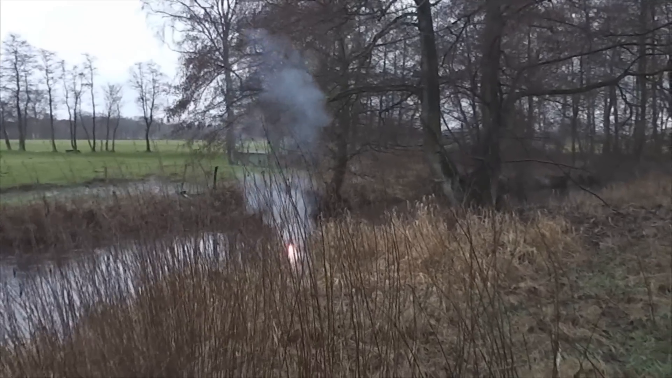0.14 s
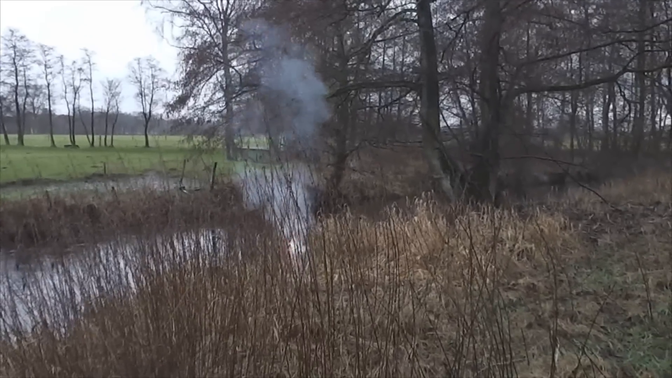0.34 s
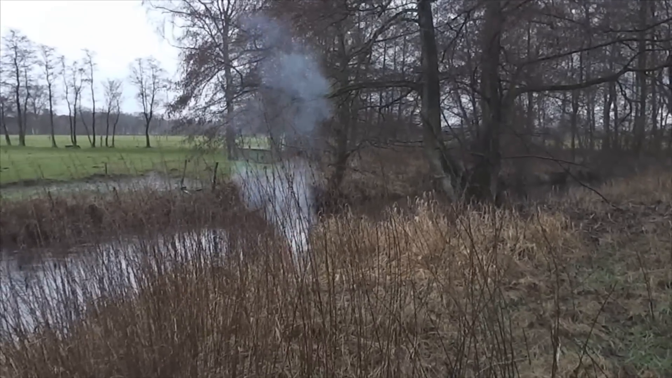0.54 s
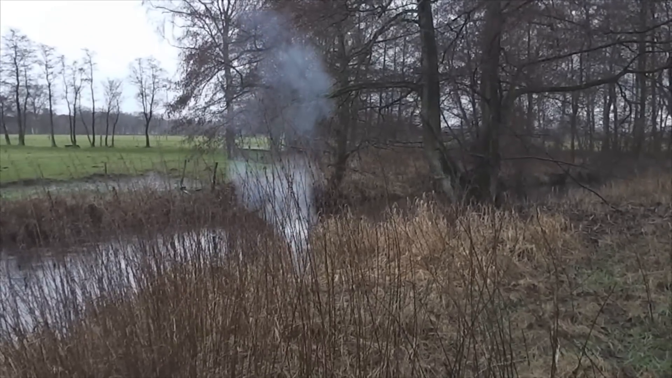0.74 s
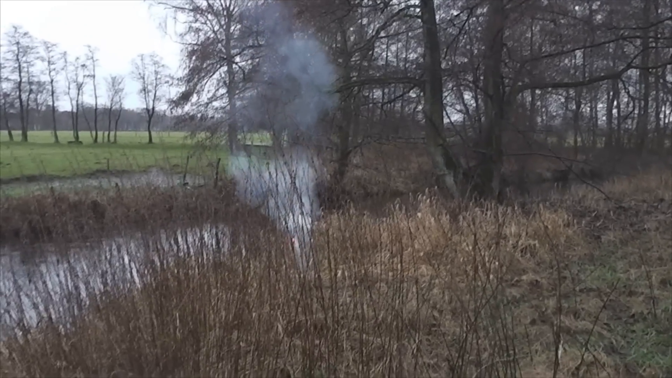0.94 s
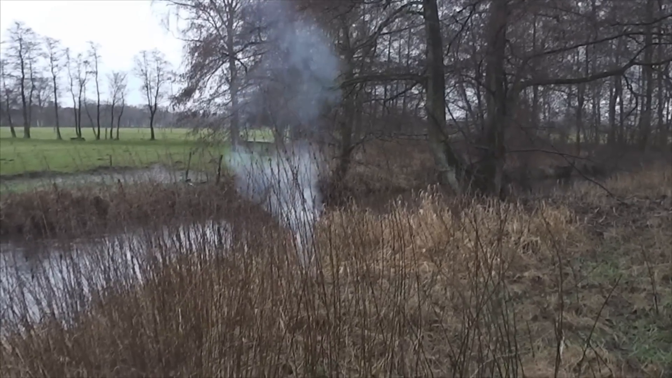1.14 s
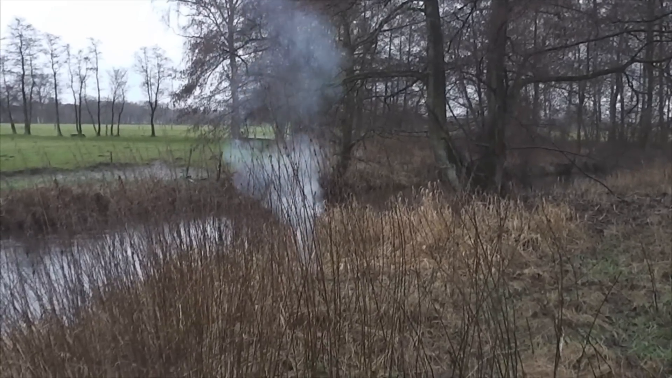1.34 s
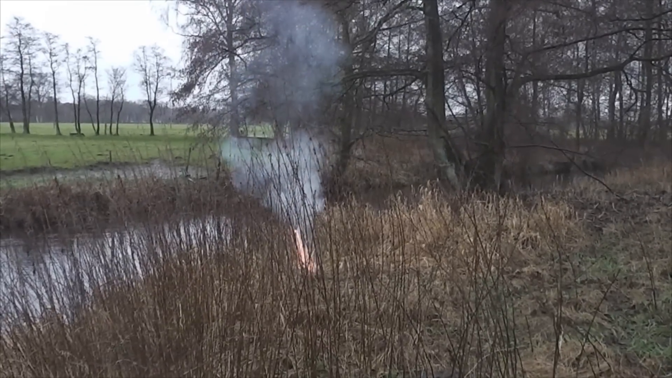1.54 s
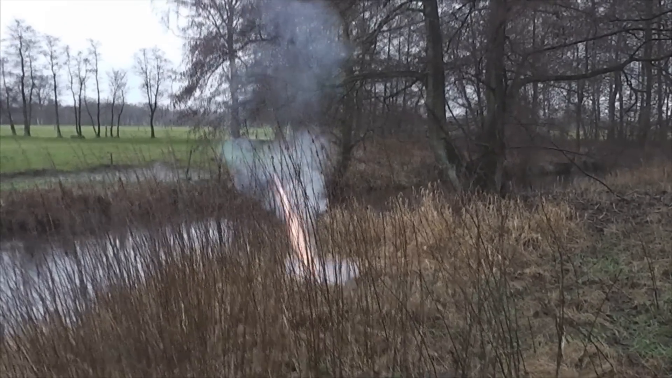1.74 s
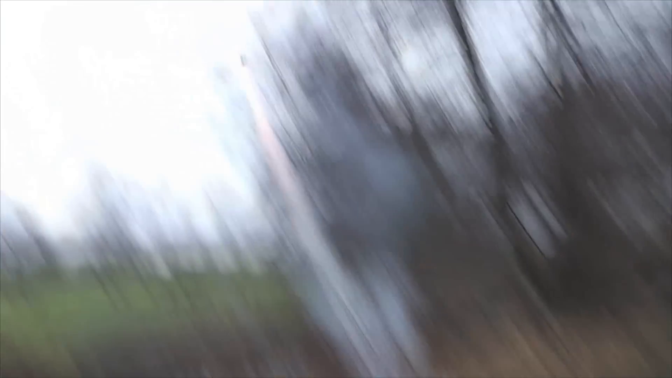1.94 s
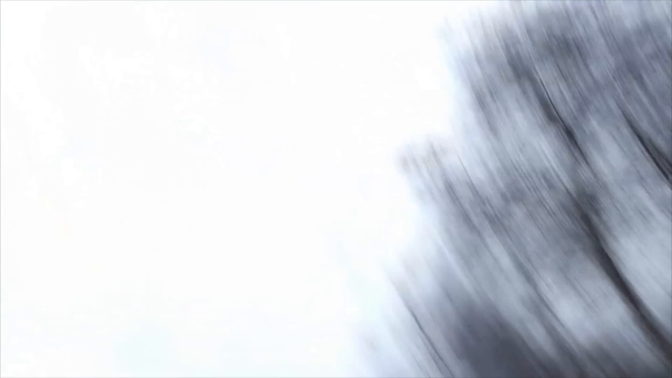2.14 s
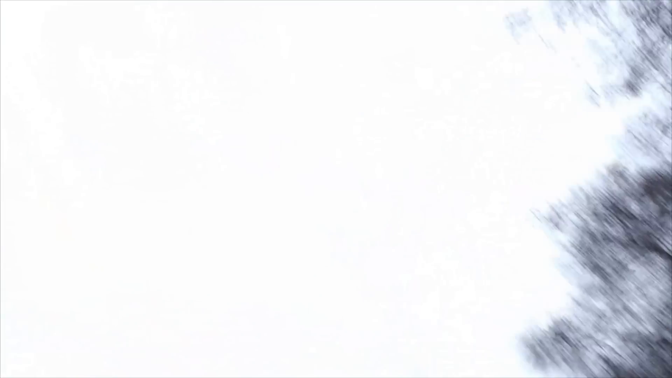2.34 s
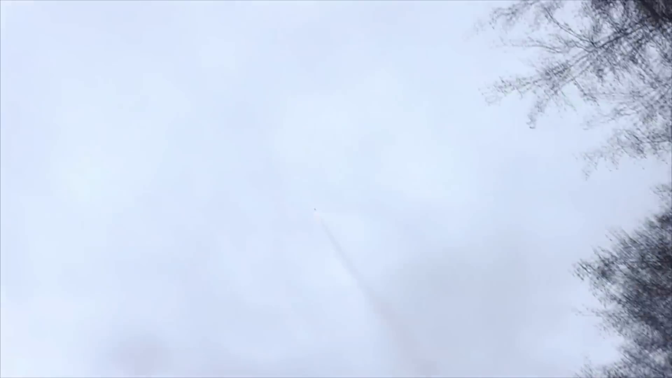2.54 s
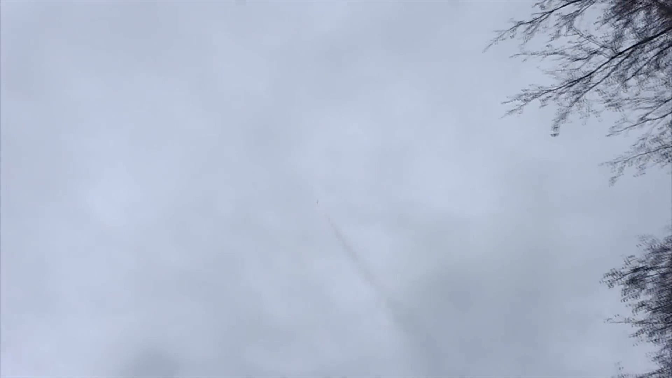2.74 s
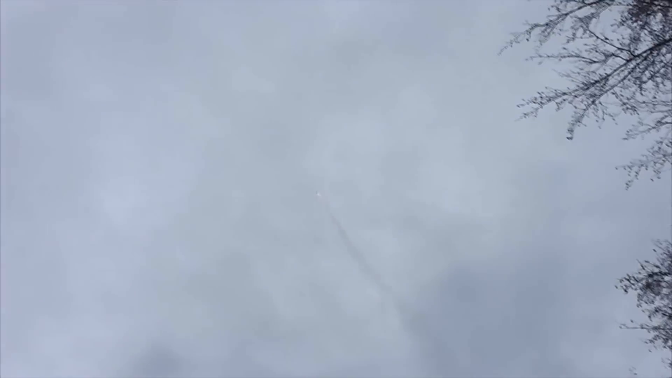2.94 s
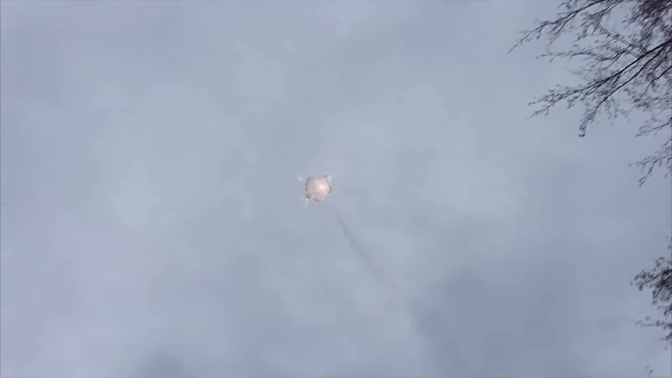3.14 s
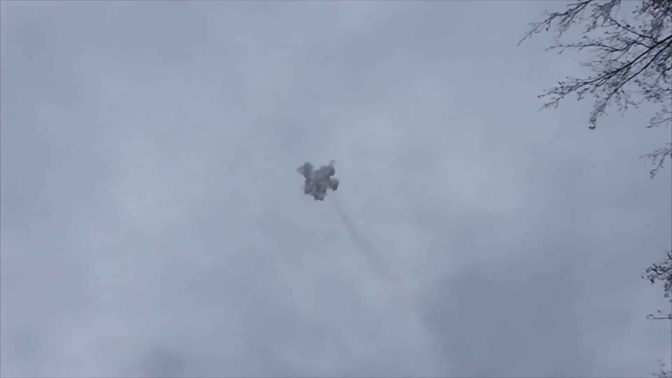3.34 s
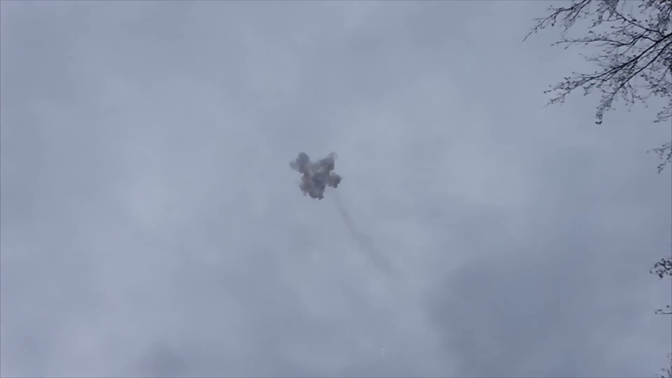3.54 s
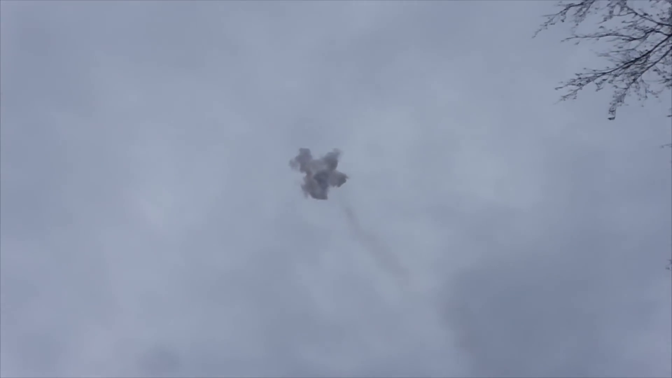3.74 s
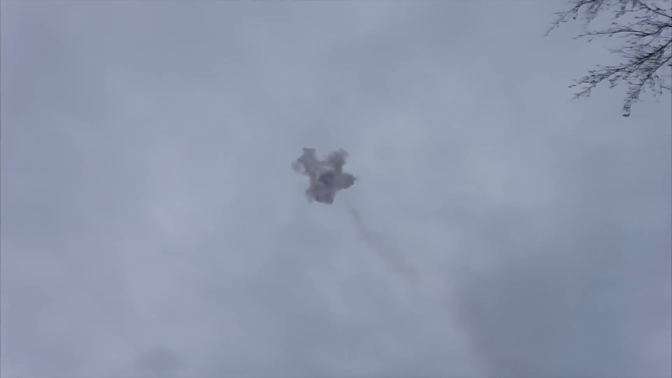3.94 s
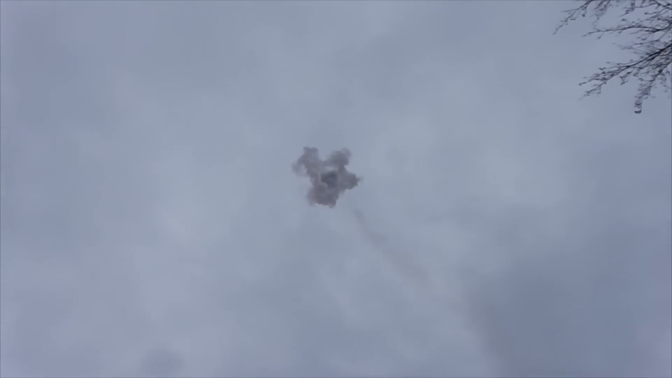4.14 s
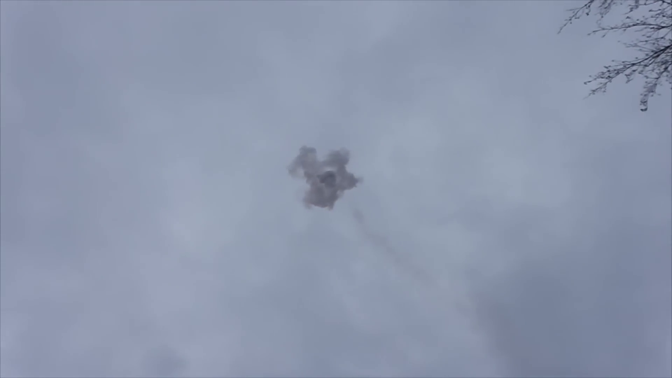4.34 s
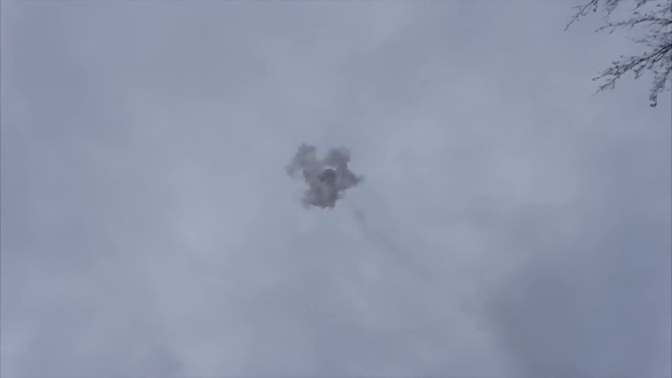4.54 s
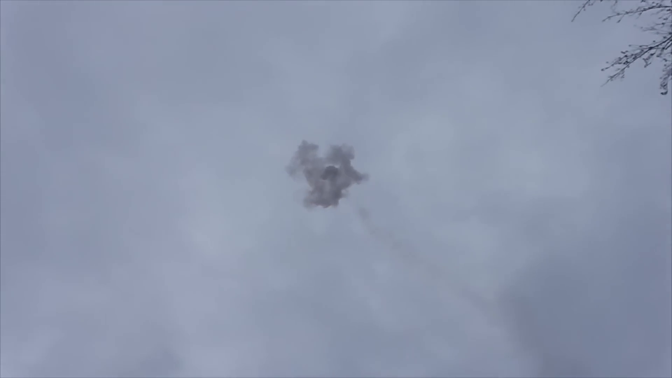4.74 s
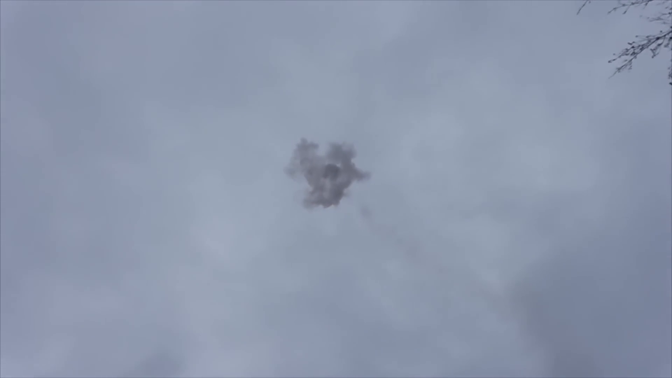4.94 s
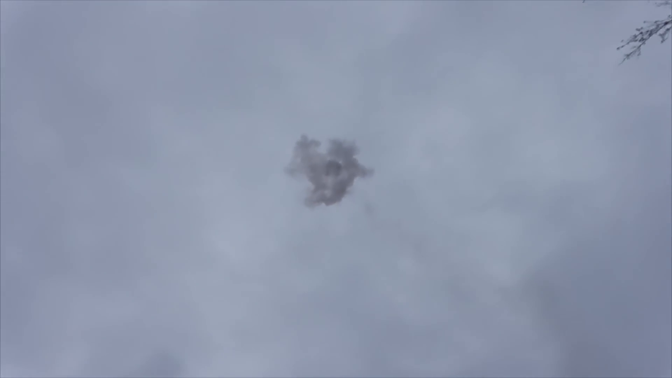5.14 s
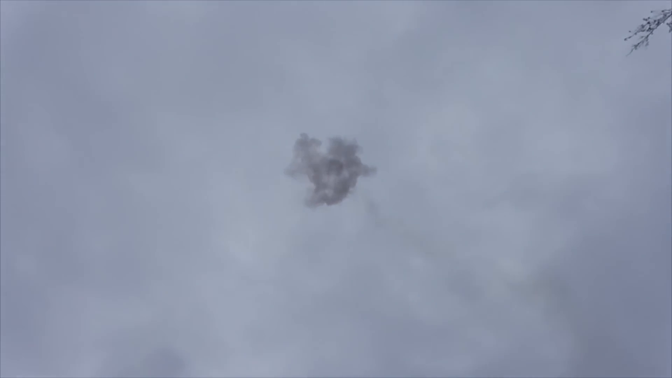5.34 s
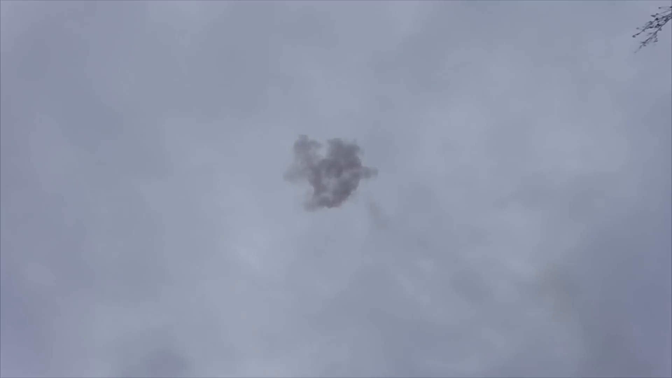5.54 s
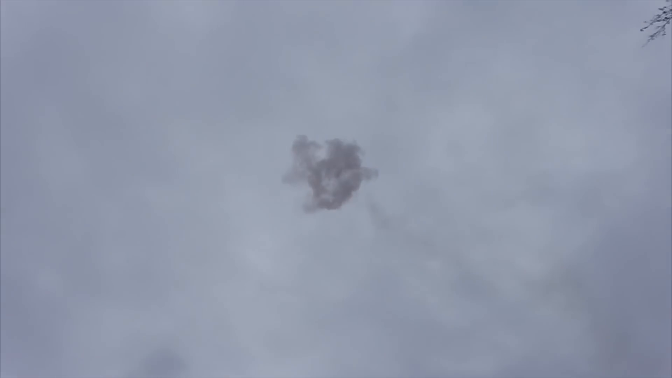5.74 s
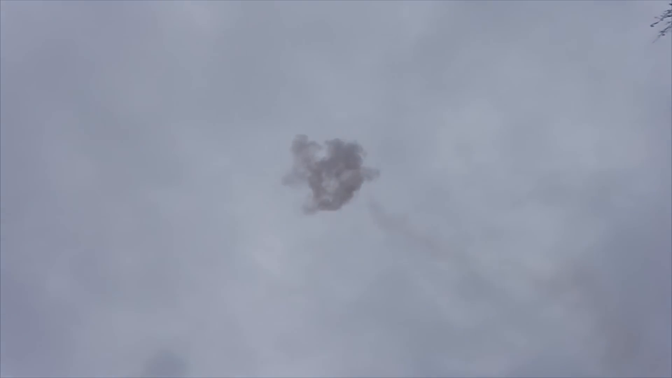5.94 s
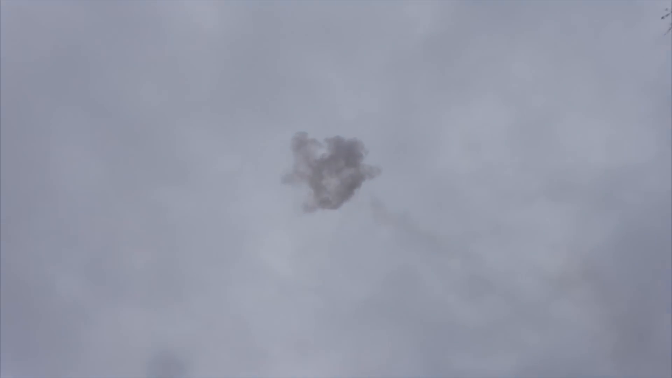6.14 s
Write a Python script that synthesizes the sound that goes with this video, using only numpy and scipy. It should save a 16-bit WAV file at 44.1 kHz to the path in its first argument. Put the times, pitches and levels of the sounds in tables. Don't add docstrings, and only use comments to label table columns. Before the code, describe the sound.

A soft background of distant traffic, stream and microphone hiss sits behind a faint sputtering fuse. A rocket bursts into a fluttering jet whoosh, thins as it climbs, and burns out with a few pops. After a short dying tail, one hard distorted crack hits overhead. Close reflections clatter at once, then deep rumbling peals with separate claps answer from woods around and slowly sink away.

```python
import sys
import numpy as np
from scipy import signal
from scipy.fft import rfft, irfft, next_fast_len
from scipy.io import wavfile
from scipy.ndimage import uniform_filter1d, map_coordinates

SR = 44100
rng = np.random.default_rng(int(sys.argv[2]) if len(sys.argv) > 2 else 0)


def linear_from_db(decibels):
    return 10 ** (np.asarray(decibels, float) / 20)


def inscribe(sig):
    pcm = np.round(np.clip(np.atleast_2d(sig).T, -1, 1) * 32767)
    wavfile.write(sys.argv[1], SR, pcm.astype(np.int16))


N = 277388
BURST_S = 3.3818


def unit(x):
    return x / np.sqrt(np.mean(x ** 2) + 1e-20)


def along(points, hz):
    f, v = np.transpose(points)
    return np.interp(np.log(hz + 1), np.log(f + 1), v)


def curves(rows):
    s, *cols = np.transpose(rows)
    return [np.interp(np.arange(N) / SR, s, c) for c in cols]


def swells(events):
    s = np.arange(N) / SR
    return sum(db * np.exp(-((s - at) / long_s) ** 2) for at, db, long_s in events)


def wobble(rate):
    knots = rng.standard_normal(int(N * rate / SR) + 4)
    return map_coordinates(knots, [np.arange(N) * rate / SR])


def sides(pan_db):
    return linear_from_db(np.array([pan_db, -pan_db]) / 2)


def rush(spectrum, alike, lumpy_db, rate):
    m = next_fast_len(N + 8192)
    hz = np.fft.rfftfreq(m, 1 / SR)
    lumps = linear_from_db(lumpy_db * wobble(rate))
    turn = np.arccos(np.clip(along(alike, hz), -1, 1)) / 2
    shape = linear_from_db(along(spectrum, hz)) * [np.cos(turn), np.sin(turn)]
    noise = lumps * rng.standard_normal((2, N))
    mid, side = irfft(rfft(noise, m) * shape, m)[:, :N]
    return unit(np.array([mid + side, mid - side]))


# (delay [ms], strength [ratio])
BANK_BOUNCES = [(1.75, 0.1), (2.3, 0.32)]


def staged(stage, spectra, alikes, lumpy_db, rate, combed=0):
    out = np.zeros((2, N))
    for k, (spectrum, alike) in enumerate(zip(spectra, alikes)):
        noise = rush(spectrum, alike, lumpy_db, rate)
        if k < combed:
            bounces = sum(strength / (1 + k) * np.roll(noise, round(ms * SR / 1000), axis=1)
                          for ms, strength in BANK_BOUNCES)
            noise = unit(noise + bounces)
        out += np.sqrt(np.clip(1 - np.abs(stage - k), 0, 1)) * noise
    return out


def puffs(rows):
    out, t = np.zeros(N + SR), np.arange(SR // 20) / SR
    for s, db, hz, cycles in rows:
        u = 3 * t * hz / cycles
        grain = uniform_filter1d(rng.standard_normal(len(t)), size=int(SR / hz))
        rough = 1 + 0.17 * grain * np.sqrt(SR / hz)
        envelope = linear_from_db(db + 4.0) * u ** 2 * np.exp(-u)
        out[round(s * SR):][:len(t)] -= envelope * rough * np.sin(2 * np.pi * hz * t)
    return out[:N]


# (frequency [Hz], level [dB per Hz])
RUMBLE_COLOUR = [(15, -40), (25, -5), (48, -3), (92, -5.5), (145, -13.5), (170, -26.5), (220, -54.5),
                 (370, -120)]
# (frequency [Hz], level [dB per Hz])
MEADOW_COLOUR = [(76, -35), (130, -8), (321, -5.5), (400, -6.5), (540, -5), (744, -5), (807, -4.5),
                 (1110, -7), (2480, -24.5), (5530, -22.5), (15700, -27.5)]
# (frequency [Hz], likeness [-1 to 1])
MEADOW_ALIKE = [(60, 0.93), (240, 0.58), (950, 0.61), (3770, 0.21), (15000, 0.35)]


def meadow():
    s = np.arange(N) / SR
    low_db = -59.5 + 1.5 * wobble(12)
    rumble = linear_from_db(low_db + 4.0) * rush(RUMBLE_COLOUR, MEADOW_ALIKE, lumpy_db=-1, rate=10)
    creep_db = np.interp(s, [3.6, 5.2], [0, 1.5])
    air_db = -49.5 + creep_db + 0.39 * wobble(4.0)
    return rumble + linear_from_db(air_db) * rush(MEADOW_COLOUR, MEADOW_ALIKE, lumpy_db=1, rate=8.5)


# (time [s], hiss level [dB])
FUSE_BURN = [(0, -53), (.14, -50), (.3, -44.5), (.41, -48), (.55, -64), (.69, -57), (1.03, -53.5),
             (1.12, -49), (1.47, -50)]
# (time [s], hiss level [dB])
MOTOR_BURN = [(1.51, -47), (1.62, -26.5), (1.68, -20), (1.72, -10), (1.78, -13.5), (2.07, -13), (2.24, -18),
              (2.45, -14.5), (2.56, -9.5)]
# (time [s], level [dB], length [s])
FLARES = [
    (.088, 10, 0.013),
    (.35, 3, .01),
    (1.937, 1, 0.011),
    (1.945, -7, .006),
    (2.052, 0.5, .03),
    (2.588, -1.5, 0.017),
]
# (frequency [Hz], level [dB per Hz])
HISS_COLOURS = [
    [(1880, -53), (3200, -22), (3490, -20.5), (4990, -3.5), (5580, -2), (7070, -7.5), (7660, -7.5),
     (8850, -9), (11500, -22), (15000, -51.5), (22000, -120)],
    [(1710, -50), (2900, -22.5), (3770, -10.5), (5480, -0.5), (7640, -1.5), (10300, -6.5), (13300, -19),
     (14900, -21.5), (15700, -27.5)],
    [(1710, -33), (2900, -16), (3310, -3.5), (3920, -3), (5070, 0.5), (6990, -1), (9120, -3.5),
     (11500, -13), (15400, -26.5)],
    [(1400, -42), (2500, -13.5), (3800, -6), (5400, -4), (7000, -8), (9000, -18), (12000, -39),
     (16000, -70)],
]
# (frequency [Hz], level [dB per Hz])
ROAR_COLOURS = [
    [(120, -48), (200, -12), (473, -17), (561, -6), (1120, 3), (3000, -20), (3900, -42), (6600, -120)],
    [(71, -50), (120, -13), (316, -15.5), (468, -7.5), (1040, -2), (1120, 0), (3000, -8.5), (3900, -38),
     (6600, -120)],
    [(71, -63), (120, -27.5), (288, -15), (535, -12), (673, -8), (846, -6.5), (1800, -2), (3000, -12.5),
     (3900, -39), (6600, -120)],
    [(71, -48), (120, -18), (363, -6.5), (398, -6.5), (454, -2.5), (1670, -2), (2800, -18), (3640, -45.5),
     (6160, -120)],
]
ROAR_UNDER_DB = [-6.5, -13.5, -7.5, -1.5]
JET_PAN_DB = [.5, .5, -.5, .5]
# (frequency [Hz], likeness [-1 to 1])
JET_ALIKE = [(60, 0.43), (99, 0.6), (160, 0.87), (270, 0.92), (450, 0.97), (740, 0.96), (1220, 0.98),
             (2010, 1), (3330, 0.76), (5500, 0.92), (9080, 0.67), (15000, 0.88)]
ECHO_ALIKE = [(60, 0.87), (240, 0.89), (950, 0.86), (3770, 0.27), (15000, 0.05)]


def flight_stage():
    s = np.arange(N) / SR
    lights = np.interp(s, [1.55, 1.72], [0, 1]) ** 1.6
    lifts = np.interp(s, [2.08, 2.25], [0, 1])
    after_s = np.clip(s - 2.6, 0, None)
    handover = 1 - np.clip(1 - after_s / 0.41, 0, 1) ** 3.2
    return lights + lifts + handover


def rocket():
    s = np.arange(N) / SR
    stage = flight_stage()
    burn_db, = curves(FUSE_BURN + MOTOR_BURN)
    burn_db = burn_db + swells(FLARES)
    flame_db = burn_db + np.interp(stage, range(4), ROAR_UNDER_DB)
    since_out = np.clip(s - MOTOR_BURN[-1][0], 0, None)

    def sink(db, rest_db, lag_s):
        return rest_db + (db - rest_db) * np.exp(-since_out / lag_s)

    crackle = linear_from_db(-27 + 130 * np.minimum(s - BURST_S, 0))
    hiss_size = np.hypot(linear_from_db(sink(burn_db, rest_db=-55.5, lag_s=0.44)), crackle)
    motor_roar = (s > MOTOR_BURN[0][0] - .05) * linear_from_db(sink(flame_db, rest_db=-43, lag_s=0.27))
    roar_size = np.hypot(motor_roar, linear_from_db(-56.5))
    flutter, alikes = wobble(45), [JET_ALIKE, JET_ALIKE, JET_ALIKE, ECHO_ALIKE]
    hiss = staged(stage, HISS_COLOURS, alikes, lumpy_db=1.32, rate=340, combed=1.7)
    hiss = hiss_size * linear_from_db(0.84 * flutter) * hiss
    roar = staged(stage, ROAR_COLOURS, alikes, lumpy_db=-0.5, rate=160)
    roar = roar_size * linear_from_db(1.1 * flutter) * roar
    spent = np.sqrt(np.clip((3.33 - s) / .05, 0, 1))
    pan = sides(np.interp(stage, range(4), JET_PAN_DB))
    return (s < BURST_S) * hiss * pan + spent * roar


# (time [s], peak level [dB], pitch [Hz], length [cycles])
SPITS = [(0.091, -41, 6000, 37), (.35, -50, 6000, 6), (.668, -53, 7000, 3.4), (0.907, -43, 2034, 1.6),
         (1.709, -12.5, 1070, 2.4), (1.732, -8.5, 1080, 1.7), (2.606, -2.5, 1200, 1.2),
         (2.6248, -3, 850, .7), (2.638, -11, 750, 1), (2.65, -4, 700, .8), (2.662, -17, 350, 1.5),
         (2.695, -12, 900, 1), (2.676, -13.5, 910, 1.9), (2.69, -18, 348, 1), (2.705, -16.5, 447, 1.4),
         (3.355, -12, 1300, 2.1), (3.358, -13, 1400, 1.1), (3.366, -4.5, 1087, 0.87),
         (3.374, -12, 1210, 1.1), (5.243, -9.5, 444, 2), (5.493, -20, 399, 1.8), (5.817, -29, 6470, 1.1),
         (5.832, -41, 6450, 2.4)]


def spits():
    return puffs(SPITS)


# (time [s], body level [dB])
ROLL_LEVEL = [(3.5, -26), (3.61, -12.5), (3.72, -7.5), (3.88, -6.5), (4.3, -7), (5.03, -9), (5.37, -13.5),
              (5.85, -17), (6.29, -23.5)]
# (time [s], level [dB], length [s])
PEALS = [(3.572, -2, .015), (3.626, -3, 0.0087), (3.728, 4, 0.016), (3.77, -7.5, 0.023), (3.87, 2.5, .03),
         (3.897, 0, 0.022), (3.929, -4.5, .03), (4.32, 3, .05), (4.601, 8, 0.013), (4.644, -5, 0.019),
         (4.693, 3.5, .025), (4.77, 4.5, 0.013), (4.798, -2, 0.018), (4.963, 2.5, 0.011), (4.901, 0.5, .03),
         (5.014, 2, 0.094), (5.173, 1, 0.088), (5.456, -3.5, .06), (5.752, 3.5, 0.074),
         (5.987, -4.5, 0.078)]
# (level [dB], hold [s], fall [dB per s])
NEAR_TREES = [
    (-12.5, .03, 198),
    (-5.5, 0.021, 129.5),
    (-19.5, .1, 138),
]
# (frequency [Hz], level [dB per Hz])
BOOM_COLOUR = [(15, -49), (25, -19.5), (108, 6), (188, -1), (260, -10.5), (340, -38), (570, -120)]
# (frequency [Hz], level [dB per Hz])
BODY_COLOURS = [
    [(120, -46), (200, -16), (517, -7), (1010, -7), (1110, -7.5), (1590, -6), (2800, -20), (3640, -50),
     (6160, -120)],
    [(110, -26), (180, -6), (260, -7.5), (375, -0.5), (506, -3.5), (748, -6), (1670, -15), (2010, -25.5),
     (2800, -35), (3640, -66), (6160, -120)],
    [(110, -37.5), (180, -21.5), (248, -8), (371, 1), (467, -6), (548, 0.5), (651, -4.5), (1030, -8),
     (2800, -37.5), (3640, -70.5), (6160, -120)],
]
# (frequency [Hz], level [dB per Hz])
TWIG_COLOUR = [(1180, -11), (2000, -8.5), (2330, -17.5), (3200, -8.5), (3870, -10), (6300, -8.5),
               (8880, -16), (15500, -31.5)]
# (frequency [Hz], likeness [-1 to 1])
ROLL_ALIKE = [(60, 1), (180, 0.98), (550, 0.93), (1650, 0.71), (4970, 0.022), (15000, -0.54)]


def roll():
    s, peals = np.arange(N) / SR, wobble(21.97)
    since = s - BURST_S
    far_db, = curves(ROLL_LEVEL)
    swell_db = swells(PEALS)
    near = [linear_from_db(db - fall * np.clip(since - hold_s, 0, None)) for db, hold_s, fall in NEAR_TREES]
    crackle = linear_from_db(-22 + 173 * np.minimum(since, 0))

    far_boom_db = far_db - 9 + 0.56 * (since - 1) + 0.79 * swell_db
    far_body_db = far_db + 0.39 * swell_db
    far_twig_db = far_db - 1.5 - 21 * np.abs(since) ** 0.45 + .4 * swell_db
    boom_size = np.hypot(near[0], linear_from_db(far_boom_db))
    body_size = np.where(since < 0, crackle, np.hypot(near[1], linear_from_db(far_body_db)))
    twig_size = np.hypot(near[2], linear_from_db(far_twig_db))

    farther = np.clip(1 + since / 0.014, 0, 1) + np.clip(since / 2.0, 0, 1) ** 1.3
    boom = boom_size * linear_from_db(0.62 * peals) * rush(BOOM_COLOUR, ROLL_ALIKE, lumpy_db=-2.5, rate=40)
    body = staged(farther, BODY_COLOURS, [JET_ALIKE, ROLL_ALIKE, ROLL_ALIKE], lumpy_db=2, rate=350)
    body = body_size * linear_from_db(0.37 * peals) * body

    hz, t, z = signal.stft(rush(TWIG_COLOUR, ROLL_ALIKE, lumpy_db=1.0, rate=400), SR, nperseg=512)
    path = np.clip(t - BURST_S - .06, 0, None) ** 1.01
    air_db = -.4 * ((hz[:, None] / 1000) ** 2 - 16) * path
    dulled = signal.istft(z * linear_from_db(np.minimum(air_db, 6)), SR, nperseg=512)[1][:, :N]
    twigs = twig_size * linear_from_db(0.29 * peals) * dulled

    begun = np.sqrt(np.clip((s - 3.28) / .05, 0, 1))
    deaf = 1 - .8 * np.exp(-((s - 3.394) / .0125) ** 4)
    sparse = 1 - .4 * np.exp(-((s - 3.414) / .028) ** 4)
    after = s > BURST_S
    layers = sparse * (after * boom + body) + after * twigs
    return begun * deaf * sides(1.56)[:, None] * layers


# (time [s], left [pressure], right [pressure], positive phase [ms], rise [ms])
SHOCKS = [(3.3818, 4.2, 4.2, 1.9, .03), (3.3857, -4.4, -4.4, 1.45, .05), (3.3935, 1.7, 1.7, 2.3, .06),
          (3.3971, -3.2, -3.2, 1.6, .2), (3.4027, .6, .35, .5, .2), (3.4088, 2.6, 2.4, .9, .12),
          (3.4107, -1.6, -1.4, 2, .2), (3.4211, 1.3, .9, 1.2, .3), (3.4226, -1.5, -.8, 1.3, .4),
          (3.4243, 1.6, 1.5, 2.5, .2), (3.4275, -2.4, -2.4, 1.3, .2), (3.4305, .9, .8, 1, .3),
          (3.4336, -1.2, -.8, 1.5, .4), (3.4362, 1.6, 1.2, 1.8, .6), (3.5871, 1.9, 1.7, 1.1, .5),
          (3.623, 1.5, 1.3, 1.2, .5)]
# (time [s], size [pressure])
CAPSULE_KNOCKS = [(3.38162, -1.2), (3.38184, -4.2), (3.38288, -2), (3.38298, -1.3), (3.39362, -1.2)]


def burst():
    out, ms = np.zeros((2, N)), np.arange(SR // 20) / SR * 1000
    for s, left, right, phase_ms, rise_ms in SHOCKS:
        u = ms / phase_ms
        front = (1 - u) * np.exp(-u) * (1 - np.exp(-ms / rise_ms))
        out[:, round(s * SR):][:, :len(ms)] += np.outer([left, right], front)
    for s, size in CAPSULE_KNOCKS:
        middle = round(s * SR)
        out[:, middle - 3:middle + 4] += size * np.hanning(7)
    return out


# (time [s], overload level [dB])
CLAPS = [(4.0515, -36), (4.2045, -35.5), (4.266, -36), (4.319, -30), (4.3611, -31.5), (4.392, -42.5),
         (4.4746, -38), (4.5174, -36), (4.5873, -40), (4.6784, -35), (4.774, -31), (4.8372, -41.5),
         (4.8926, -44), (4.9614, -36), (5.059, -45.5)]


def lone_echoes():
    return puffs([(s - .001, 3.0 + 0.17 * db, 520, 1.2) for s, db in CLAPS])


def scene():
    return meadow() + rocket() + spits() + roll() + burst() + lone_echoes()


# (time [s], share of bass removed [0 to 1])
WIND_SHUT = [(1.82, 0), (1.85, 0.55), (2.06, 0.76), (2.09, 1), (2.2, 0.83), (2.24, 0.56), (2.45, 0.71),
             (2.55, 0)]


def wind_filter(x):
    m = next_fast_len(N + 8192)
    hz = np.fft.rfftfreq(m, 1 / SR)
    shut, = curves(WIND_SHUT)
    bass = irfft(rfft(x, m) / (1 + (hz / 220) ** 4), m)[:, :N]
    return x - np.clip(shut, 0, 1) * bass


def band_limit(x):
    return signal.sosfilt(signal.butter(12, 16400, fs=SR, output="sos"), x)


def record(dry):
    m = next_fast_len(N + 8192)
    hz = np.fft.rfftfreq(m, 1 / SR)
    x = np.clip(0.95 * wind_filter(dry), -1, 1)
    x = irfft(rfft(x, m) * (hz < 15800), m)[:, :N]
    return band_limit(x)


dry = scene()
out = record(dry)
inscribe(out)
```